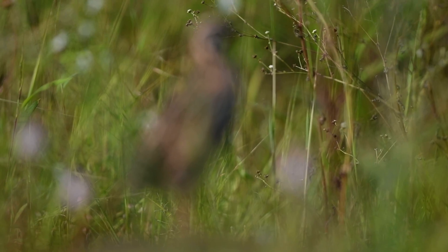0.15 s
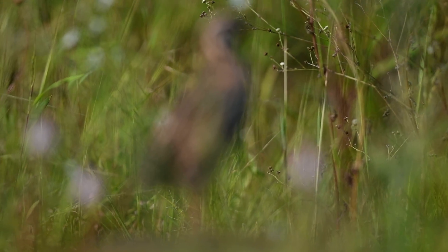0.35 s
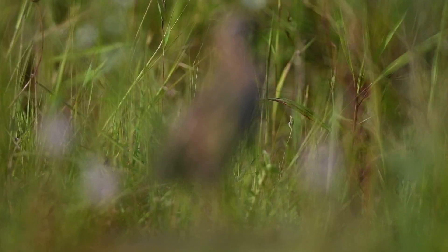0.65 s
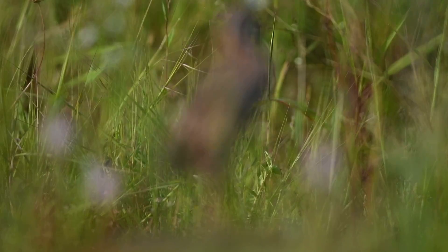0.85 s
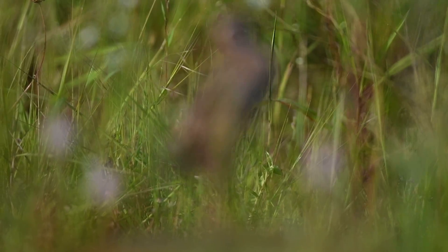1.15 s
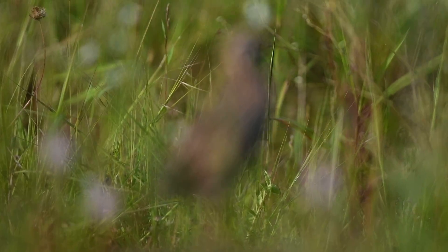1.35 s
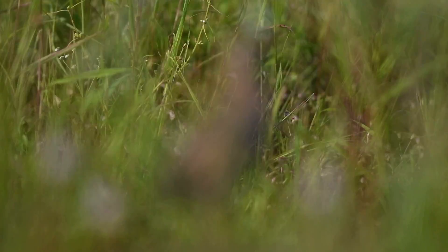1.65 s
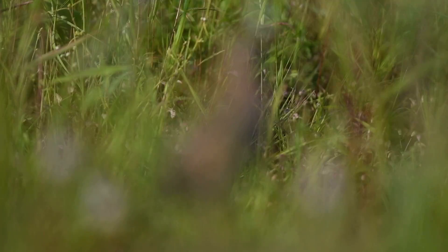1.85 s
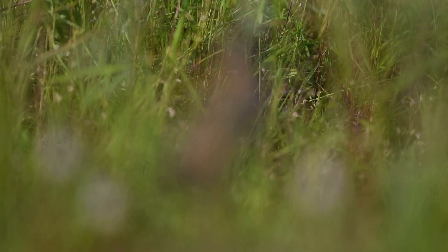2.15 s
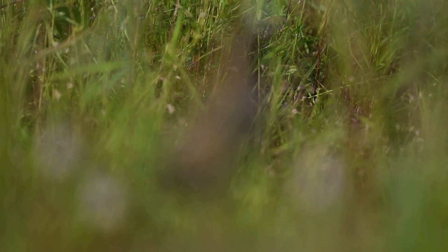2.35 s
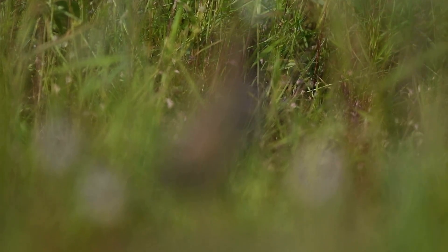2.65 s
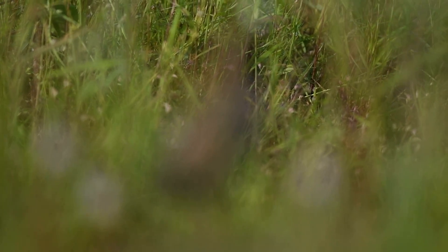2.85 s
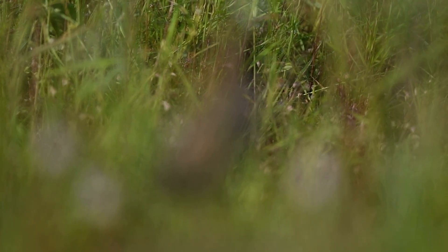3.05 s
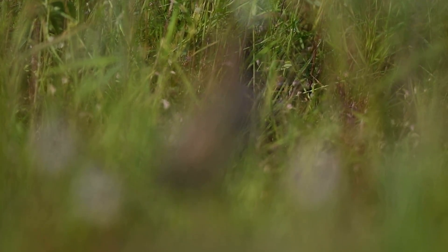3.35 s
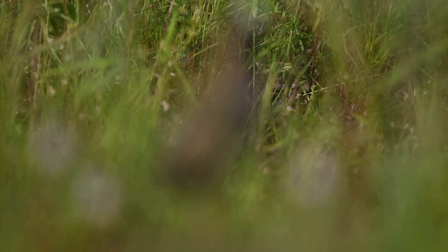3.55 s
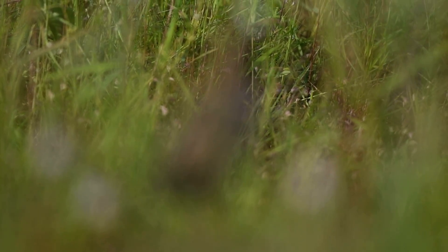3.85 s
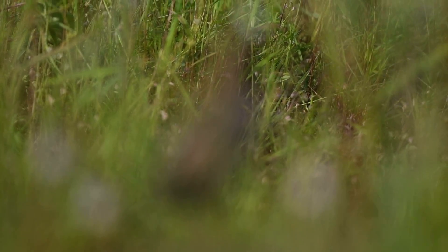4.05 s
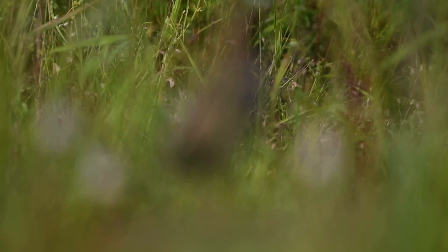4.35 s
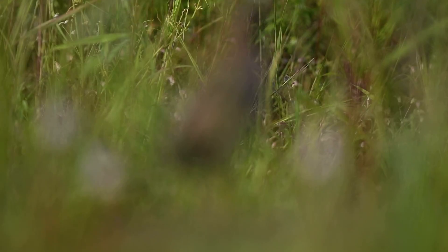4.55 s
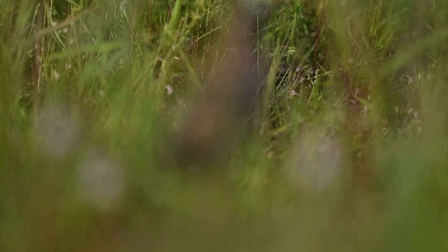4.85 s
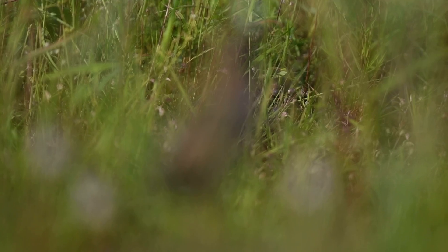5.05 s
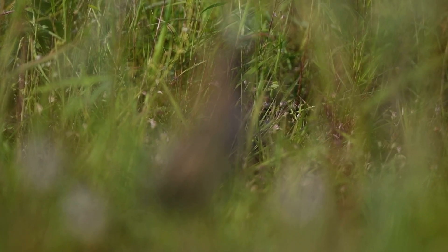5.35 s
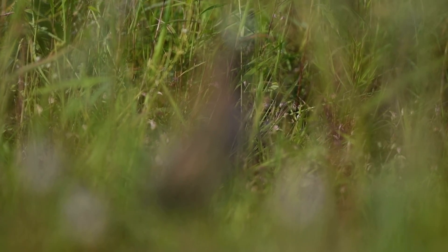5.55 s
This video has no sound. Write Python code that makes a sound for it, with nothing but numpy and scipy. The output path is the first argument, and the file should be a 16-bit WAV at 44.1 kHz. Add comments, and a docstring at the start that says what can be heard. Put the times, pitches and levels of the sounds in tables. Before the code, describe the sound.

A quail close by whistles sharp, high paired notes that flick upward at a steady pace, over quiet grassland murmur and faint distant birds.

```python
"""A rain quail in open grassland whistles four pairs of notes, a long one then a short one, each ending in a fast upward flick.
The grass scatters each note and distant edges throw it back. Other birds chirp far away,
a few soft knocks sound near the microphone, and the field murmurs under a faint high whine."""
import sys
import numpy as np
from scipy import signal
from scipy.fft import rfft, irfft, next_fast_len
from scipy.io import wavfile
from scipy.ndimage import uniform_filter1d

SR = 44100
rng = np.random.default_rng(int(sys.argv[2]) if len(sys.argv) > 2 else 0)


def bounce(signal):
    """Save signal as a 16-bit WAV file at the path given by the first command-line argument."""
    frames = np.transpose(np.atleast_2d(signal))
    limited = np.clip(frames, -1, 1)
    pcm = np.round(limited * 32767).astype(np.int16)
    wavfile.write(sys.argv[1], SR, pcm)


N = 251811

# long notes: (start s, time until the flick s, level dB)
LONG_NOTES = [(.8541, 0.086, -7), (2.1399, 0.083, -6.5), (3.4072, .086, -7), (4.6549, .0868, -7)]
# short notes: (start s, time until the flick s, level dB)
SHORT_NOTES = [(-.146, 0.064, -7.5), (1.129, 0.060329, -6.3), (2.4169, 0.061, -7), (3.6836, 0.06, -7), (4.9333, 0.059518, -6.5)]
# overtones of the whistle: (multiple, dB in the left ear, dB in the right ear)
OVERTONES = [(2, -19.5, -30.5), (3, -38, -50), (4, -51, -60)]
# a close reflection: (delay s, left dB, right dB)
ECHOES = [(0.0264, -22.5, -19.5)]
# scatter from stalks, tussocks and the far field: (onset s, t60 s, level dB)
SCATTER = [(.0002, 0.01, -3), (.002, 0.062, -10), (.008, .13, -17), (0.029, 1, -32.5)]
# soft knocks: (s, peak dB)
KNOCKS = [(0.399, -30.5), (0.646, -35.5), (0.693, -31), (0.81, -31.5), (1.4, -30.5), (1.477, -39.5), (1.783, -41.5),
          (1.841, -33.5), (1.967, -33), (4.307, -30.5), (4.458, -36.5), (4.5, -31), (4.614, -34)]
# what the knocks ring with: (Hz, dB, t60 s)
THUD = [(262.18, -11.5, 0.056), (367, -1, 0.06684), (428.22, 2, 0.044), (604.44, -2.5, .028), (842.34, -5.5, 0.0079), (1240, -5.5, .016), (1592.5, -8, 0.024)]
TICK = [(1000, -30), (2000, -6), (3500, 7.5), (6000, -0.5), (9000, -3.5), (11000, -17), (15000, -25.5)]
# the murmur of the field: (Hz, dB per Hz)
FIELD = [(20, -14.5), (45, -7.5), (100, -3.5), (180, -5.5), (260, -3.5), (340, -9), (520, -3.5), (750, -1.5), (1020, -5), (1200, -12.5), (1800, -13), (2300, -10.5), (2600, -25), (5000, -50.5)]
# high hiss: (Hz, dB per Hz)
HISS = [(1500, -30), (2600, -15), (3200, -3.5), (4200, -5), (5000, -5.5), (5600, -1), (6000, -3.5), (7000, -14), (9000, -17), (12000, -18.5), (15500, -25)]
HISS_DB = -59.5
# likeness of the two ears: (Hz, correlation)
LIKENESS = [(250, 0.99), (500, 0.9767), (750, 0.19), (1000, 0.068), (1500, -0.051), (2100, -0.45), (3000, -.3), (6000, -0.11), (9000, .1)]
# two narrow bands are hollow: (Hz, width Hz, depth dB)
HOLLOWS = [(2621.3, 150, -11.5), (7782.3, 250, -32)]
LEAD = SR // 4  # fixed
TOP_HZ = 15900  # fixed
# colour of the call on its way through the grass: (Hz, dB)
CALL_COLOUR = [(1000, -29.5), (2300, -13.5), (3000, -0.5), (3600, -0.5), (4400, -6.5), (5700, 0), (6050, -13), (6350, -2), (7300, -5.5), (8300, -6), (9600, -0.5), (10500, -4.5), (12500, -5), (15000, -18.5)]
# thin stalks scatter short waves best: (Hz, dB)
SCATTER_COLOUR = [(3220, -17), (3550, -7), (4300, 0), (7300, 1), (9000, 0), (14000, -3)]  # fixed
# narrow resonances in the murmur: (Hz, width Hz, dB)
FIELD_PEAKS = [(458.2, 17, 11.5), (672.98, 60, 4.5), (818, 20, 3.5), (998, 30, 8), (2038, 58, 10.5)]
# level of the murmur: (s, dB)
MURMUR = [(0.0, -53), (0.7, -54), (1.14, -54.5), (1.88, -54.5), (2.15, -55.5), (5.71, -54.5)]
MURMUR_GAIN_DB = 3.5
# the upper murmur comes from the right: (Hz, left minus right dB)
MURMUR_PAN = [(450, 0), (750, -2), (1500, 0.5), (2100, -9)]
# puffs of air on the microphone: (s, length s, level dB)
PUFFS = [(0.077, 0.1, -59), (3.46, 0.16, -60), (4.013, 0.142, -54), (4.965, 0.11, -53)]
PUFF = [(20, -8), (45, -9.5), (95, -3), (150, -6.5), (300, -41), (1000, -70.5)]
# how far the left ear leads for the quail: (Hz, radians)
EAR_PHASE = [(3200, -0.4932), (3600, 0.89), (4200, 0.9), (5500, 0.063), (6500, 2), (10000, -0.047)]
# a soft contact has little treble: (Hz, dB)
SOFTNESS = [(120, -6), (240, 2.5), (600, -3.5), (1700, -7.5), (3000, -15.5), (9000, -40)]
# the long note settles from above and starts gently; the short one starts flat and sharply
LONG_VOICE = dict(hold_hz=3086.2, offset_hz=242, attack_s=0.006, thinning_db=-21)
SHORT_VOICE = dict(hold_hz=3159, offset_hz=-115, attack_s=.0028, thinning_db=-19)
# every note drops in from above, settles, and swells to a crest shortly before the flick
DROP_HZ, DROP_S, SETTLE_S = 1150, .0011, .02  # fixed
# the flick leaps up, hangs for a moment, then sags as it dies
FLICK_HZ, FLICK_S, HANG_S = 4500, .0022, .011  # fixed
RELEASE_S, RELEASE_SAG_HZ, RELEASE_DB = 0.0089, 1292.5, -25.5
# the balance of the whistle depends on its pitch: (Hz, left minus right dB)
WHISTLE_PAN = [(3160, 2), (3200, .7), (3290, 0), (3400, -3.5), (3650, -4.5), (4500, 1), (5700, 0), (7200, 4.5)]  # fixed
# a far songbird's falling slurs: (start s, length s, first Hz, last Hz, level dB)
SLURS = [(0.502, .012, 4650, 2712, -50), (0.723, .013, 4740, 2750, -50), (0.973, .06, 3885, 2800, -49.5), (1.26, .033, 2430, 1720, -58.5),
         (2.274, .035, 3196, 2670, -57.5), (4.829, .034, 6745, 5611, -59), (5.598, .045, 6500, 5470, -61), (5.658, .046, 6689, 5697, -57)]
SLUR_BEND = 1.9
# its even run of slurs, each lower and softer than the one before
RUN_START_S, RUN_STEP_S, RUN_NOTE_S = 1.722, .0762, .037  # fixed
# its short arched peeps: (start s, pitch Hz, level dB)
PEEPS = [(.593, 2585, -54), (.798, 2690, -53)]
PEEP_S, PEEP_ARCH_HZ = 0.025, 185
# its one long rising whistle: (s, pitch Hz, level dB)
RISE = [(1.503, 2800, -45.5), (1.521, 3070, -48.5), (1.605, 3590, -42.5), (1.643, 3998, -42), (1.652, 4000, -58)]
RISE_GAIN_DB = 2.5
# buzzy warbles: (start s, length s, pitch Hz, glide Hz, arch Hz, level dB)
WARBLES = [(1.03, .095, 3280, 760, -200, -51), (1.208, .13, 2100, 0, 200, -59), (1.385, .12, 2140, 490, 0, -56), (1.39, .061, 3480, -210, 400, -45.5),
           (4.145, .12, 2110, 350, 0, -59.5), (4.661, .092, 1830, -220, 450, -57), (4.924, .075, 1860, 235, 90, -54), (5.33, .14, 1790, 70, 230, -55.5),
           (5.35, .14, 4200, 200, 230, -62), (5.47, .052, 3790, -80, 110, -58), (5.512, .036, 1780, 250, 70, -55)]  # fixed
BUZZ_HZ, BUZZ_DEPTH = 176, .045  # fixed
KNOCK_GAIN_DB, TICK_DB = -5, -51
# each knock rebounds twice, the thud fading faster than the tick
REBOUND_S, REBOUND_THUD_DB, REBOUND_TICK_DB = 0.051, -9.5, -2.5
ONSET_S = .006  # fixed
SWELL_DB_PER_S = None
CREST_DB, CREST_S, CREST_WIDTH_S = 4, .02, 0.02
# returns from the far edges of the field: (delay s, smear t60 s, left dB, right dB)
FAR_ECHOES = [(.11, .25, -46, -42.5), (.176, .001, -36.5, -32.5)]
RUN_FIRST_HZ, RUN_LAST_HZ, RUN_SINK_PER_NOTE = 3750, 3020, .021  # fixed
RUN_DB, RUN_FADE_DB = -48, -1
WHINE_HZ = 15740  # fixed
WHINE_DB = -82.5
# they too favour the top of the flick: (Hz, dB)
FAR_COLOUR = [(3200, -7.5), (4500, 2.5), (7300, 4)]
# the faintest birds twitter at random, in high falling slurs
TWITTER_PER_S, TWITTER_S, TWITTER_DB = 8.1, .03, -66
TWITTER_HZ, TWITTER_SPREAD_HZ, TWITTER_FALL_HZ = 5700, 350, 700


def undb(db):
    """Decibels to gain."""
    return 10 ** (np.asarray(db) / 20)


def level(x, db):
    """Scale to an rms level."""
    return x * undb(db) / np.sqrt(np.mean(x ** 2))


def on_bins(points, count=N):
    """(Hz, value) points spread over the Fourier bins on a log axis."""
    hz, value = np.transpose(points)
    return np.interp(np.log(np.arange(count // 2 + 1) * SR / count + 1), np.log(hz), value)


def noise(spectrum):
    """Stereo noise of rms 1 with the given colour; the bass is the same in both ears."""
    mid, side = rfft(rng.standard_normal((2, N)))
    alike = np.clip(on_bins(LIKENESS), -1, 1)
    both = mid * np.sqrt(1 + alike) + side * np.sqrt(1 - alike) * np.array([[1], [-1]])
    return level(irfft(both * undb(on_bins(spectrum)), N), 0)


def smooth(x, size):
    """Round the corners of a curve."""
    return uniform_filter1d(uniform_filter1d(x, size), size)


def walk(rate, count=N):
    """Slow chance with a spread near 1."""
    k = int(SR / rate)
    return np.sqrt(2) * smooth(np.repeat(rng.standard_normal(count // k + 1), k), k)[:count]


def add(out, start_s, sound):
    """Mix a sound in from a given time."""
    i = int(start_s * SR)
    out[:, i:i + sound.shape[-1]] += sound[..., :out.shape[1] - i]


def whistle(length_s, hold_hz, offset_hz, attack_s, thinning_db, waver=0.0004, shimmer_db=0.35, purity_db=-24, air_db=-48):
    """One note, begun a moment early: a tone that drops in, swells on a level pitch and thins as it flicks up an octave."""
    t = np.arange(-ONSET_S, length_s + HANG_S + RELEASE_S, 1 / SR)
    climb = .5 + np.arctan((t - length_s) / FLICK_S) / np.pi
    release = (np.maximum(t - length_s - HANG_S, 0) / RELEASE_S) ** 2
    drop = DROP_HZ / (1 + np.exp(t / DROP_S)) + offset_hz * np.exp(-t / SETTLE_S)
    hz = hold_hz + drop + FLICK_HZ * climb - RELEASE_SAG_HZ * release
    attack = 1 - np.exp(-np.logaddexp(0, t / DROP_S) * DROP_S / attack_s)
    crest = np.exp(-(np.maximum(length_s - CREST_S - t, 0) / CREST_WIDTH_S) ** 2)
    db = thinning_db * climb ** 2.0 + RELEASE_DB * release + CREST_DB * (crest - 1)
    phase = 2 * np.pi * np.cumsum(hz * (1 + waver * walk(470, len(t)))) / SR
    tone = np.sin(phase) * undb(np.interp(hz, *np.transpose(WHISTLE_PAN)) * np.array([[.5], [-.5]]))
    # the tone grows purer as the pitch climbs
    richness = np.minimum(2 * attack, 1) * undb(purity_db * np.log2(hz / hz.min()) ** 4)
    for k, *ears_db in OVERTONES:
        multiple = round(k)
        tone += undb(ears_db)[:, None] * richness * np.sin(multiple * phase) * (multiple * hz < SR / 2)
    # a trace of rushing air rides on the tone, most where it is loudest
    tone += undb(air_db + db) * rng.standard_normal(len(t))
    return np.sqrt(2) * tone * attack * undb(db + shimmer_db * walk(400, len(t)))


# overall level of the quail
QUAIL_DB = -0.53


def quail():
    """Long and short notes in turn, on a time line that begins a little early so that echoes carry in."""
    out = np.zeros((2, LEAD + N))
    for notes, voice in ((LONG_NOTES, LONG_VOICE), (SHORT_NOTES, SHORT_VOICE)):
        for start_s, length_s, db in notes:
            add(out, LEAD / SR + start_s - ONSET_S, undb(db + QUAIL_DB) * whistle(length_s, **voice))
    return out


def grassland(call):
    """The direct call, bright scatter from the grass and faint returns from the far edges of the field."""
    near, far = np.zeros((2, 2, SR))
    for onset_s, t60, db in SCATTER:
        add(near, onset_s, undb(db) * tail(t60))
    for delay_s, *ears_db in ECHOES:
        add(near, delay_s, undb(ears_db)[:, None])
    for delay_s, t60, *ears_db in FAR_ECHOES:
        add(far, delay_s, undb(ears_db)[:, None] * tail(t60))
    returned = sum(colour(signal.fftconvolve(call.mean(axis=0)[None], response, axes=1)[:, :LEAD + N], spectrum)
                   for response, spectrum in ((near, SCATTER_COLOUR), (far, FAR_COLOUR)))
    heard = colour(call + returned, CALL_COLOUR)[:, LEAD:]
    return irfft(rfft(heard) * np.exp(1j * on_bins(EAR_PHASE) * np.array([[.5], [-.5]])), N)


def far_birds(wet_db=-11, t60=0.12, unevenness=0.26, count=6):
    """Slurs, a sinking run, peeps, a rising whistle and buzzy warbles, slightly blurred by the distance."""
    out = np.zeros((1, N))
    for start_s, length_s, first_hz, last_hz, db in SLURS:
        add(out, start_s, chirp(slur(length_s, first_hz, last_hz), db))
    for k in range(count):
        hz = slur(RUN_NOTE_S, RUN_FIRST_HZ, RUN_LAST_HZ) * (1 - RUN_SINK_PER_NOTE * k)
        add(out, RUN_START_S + k * RUN_STEP_S, chirp(hz, RUN_DB + k * RUN_FADE_DB))
    for start_s, hz, db in PEEPS:
        add(out, start_s, chirp(arch(PEEP_S, hz, 0, PEEP_ARCH_HZ), db))
    times, pitches, levels = np.transpose(RISE)
    t = np.arange(times[0], times[-1], 1 / SR)
    add(out, times[0], chirp(np.interp(t, times, pitches), np.interp(t, times, levels) + RISE_GAIN_DB))
    for start_s, *course, db in WARBLES:
        hz = arch(*course)
        trill = np.sin(2 * np.pi * BUZZ_HZ * np.arange(len(hz)) / SR) + unevenness * walk(250, len(hz))
        add(out, start_s, chirp(hz * (1 + BUZZ_DEPTH * trill), db))
    return out + undb(wet_db) * signal.fftconvolve(out, tail(t60), axes=1)[:, :N]


def knocks(contact_t60=0.086, tick_t60=0.057, rise_s=0.0032, count=3):
    """Each brief rough contact and its rebounds ring a few damped low modes and give a small dry tick."""
    t = np.arange(SR // 8) / SR  # fixed
    body = sum(undb(db - 60 * t / t60) * np.cos(2 * np.pi * hz * t) for hz, db, t60 in THUD)
    thuds, ticks = np.zeros((2, 1, N))
    for start_s, db in KNOCKS:
        for k in range(count):
            at_s = start_s + k * REBOUND_S
            push = tail(contact_t60, len(t))[0] * np.minimum(t / rise_s, 1)
            thud = colour(signal.fftconvolve(push, body), SOFTNESS)
            thud = thud / np.sqrt(uniform_filter1d(thud ** 2, size=256).max())
            add(thuds, at_s - rise_s, undb(db + KNOCK_GAIN_DB + k * REBOUND_THUD_DB) * thud)
            add(ticks, at_s, undb(TICK_DB + k * REBOUND_TICK_DB - 60 * t / tick_t60))
    return thuds + ticks * noise(TICK)


def field(flicker_db=1.18, hiss_swell_db=1.0286, whine_waver_db=0.0):
    """A low distant murmur with a few resonances, a steady hiss and a thin wavering whine."""
    murmur_db = np.interp(np.arange(N) / SR, *np.transpose(MURMUR)) + MURMUR_GAIN_DB + flicker_db * walk(14)
    ears = undb(on_bins(MURMUR_PAN) * np.array([[.5], [-.5]]))
    murmur = level(irfft(rfft(bells(noise(FIELD), FIELD_PEAKS)) * ears, N), 0) * undb(murmur_db)
    hiss = noise(HISS) * undb(HISS_DB + hiss_swell_db * walk(2.3))
    whine = np.sqrt(2) * np.sin(2 * np.pi * np.cumsum(WHINE_HZ + 2 * walk(30)) / SR) * undb(WHINE_DB + whine_waver_db * walk(3))
    return murmur + hiss + whine


def colour(x, spectrum):
    """Filter by a (Hz, dB) curve."""
    count = next_fast_len(x.shape[-1])
    return irfft(rfft(x, count) * undb(on_bins(spectrum, count)), count)[..., :x.shape[-1]]


def bells(x, bands):
    """Lift or hollow out narrow (Hz, width, dB) bands."""
    count = next_fast_len(N, True)
    bins = np.arange(count // 2 + 1) * SR / count
    return irfft(rfft(x, count) * undb(sum(db * np.exp(-np.minimum(((bins - hz) / width) ** 2, 20)) for hz, width, db in bands)), count)[..., :N]


def tail(t60, count=SR):
    """Stereo noise that dies away, with unit energy in each ear."""
    burst = rng.standard_normal((2, count)) * undb(-60 * np.minimum(np.arange(count) / SR / t60, 10))
    return burst / np.sqrt(np.sum(burst ** 2, axis=1, keepdims=True))


def breeze():
    """Light air now and then rumbles on the microphone."""
    push = np.zeros((1, N))
    for start_s, length_s, db in PUFFS:
        add(push, start_s, undb(db) * np.hanning(int(length_s * SR)))
    return push * noise(PUFF)


def progress(length_s):
    """A ramp from 0 to 1 over a note."""
    return np.linspace(0, 1, int(length_s * SR), endpoint=False)


def chirp(hz, db, flutter_db=2.1):
    """A thin fluttering tone that swells and fades along a pitch course."""
    swell = np.sqrt(2 * np.sin(np.pi * np.arange(len(hz)) / len(hz)))
    return swell * undb(db + flutter_db * walk(120, len(hz))) * np.sin(2 * np.pi * np.cumsum(hz) / SR)


def slur(length_s, first_hz, last_hz):
    """Pitch that falls quickly and then levels out."""
    return last_hz + (first_hz - last_hz) * (1 - progress(length_s)) ** SLUR_BEND


def arch(length_s, hz, glide_hz, arch_hz):
    """Pitch that glides through a centre and bulges half way."""
    u = progress(length_s)
    return hz + glide_hz * (u - .5) + arch_hz * np.sin(np.pi * u)


def twitter():
    """Tiny high slurs from birds at the edge of hearing."""
    out = np.zeros((1, N))
    for when, pitch, strength in rng.uniform(-1.1, 1, (int(TWITTER_PER_S * N / SR), 3)):
        hz = TWITTER_HZ + TWITTER_SPREAD_HZ * pitch
        add(out, (when + 1) / 2 * N / SR, chirp(slur(TWITTER_S, hz + TWITTER_FALL_HZ, hz), TWITTER_DB + 3 * strength))
    return out


def scene():
    """The quail in its field."""
    return grassland(quail()) + far_birds() + knocks() + breeze() + field() + twitter()


def record(dry):
    """Two narrow hollows in the response and a steep cut at the top."""
    return signal.sosfilt(signal.ellip(10, .1, 80, TOP_HZ, fs=SR, output="sos"), bells(dry, HOLLOWS))  # fixed


dry = scene()
out = record(dry)
bounce(out)
```